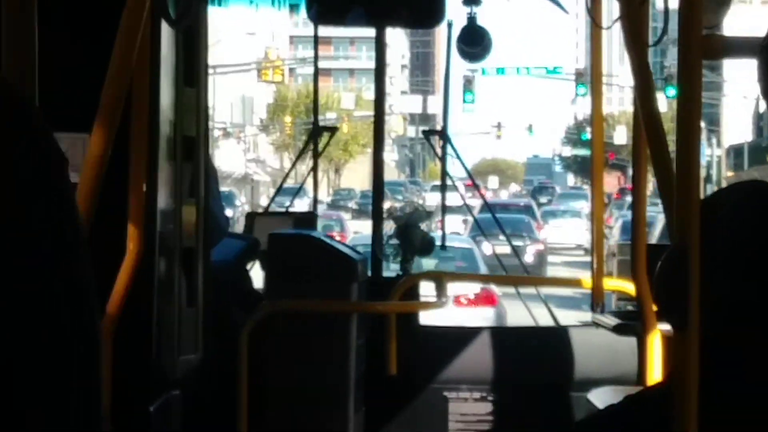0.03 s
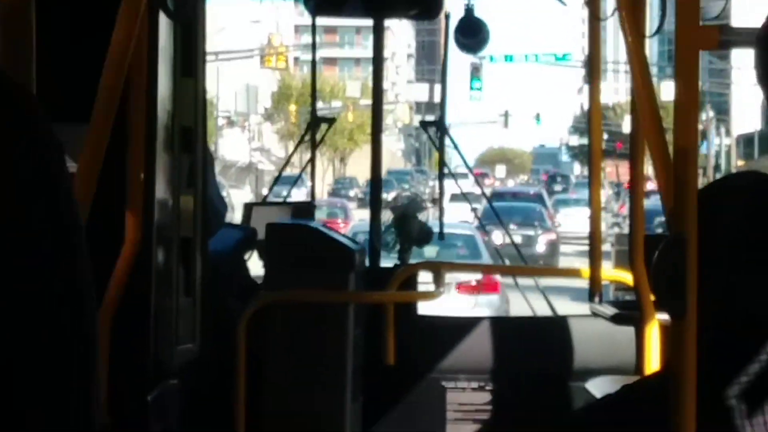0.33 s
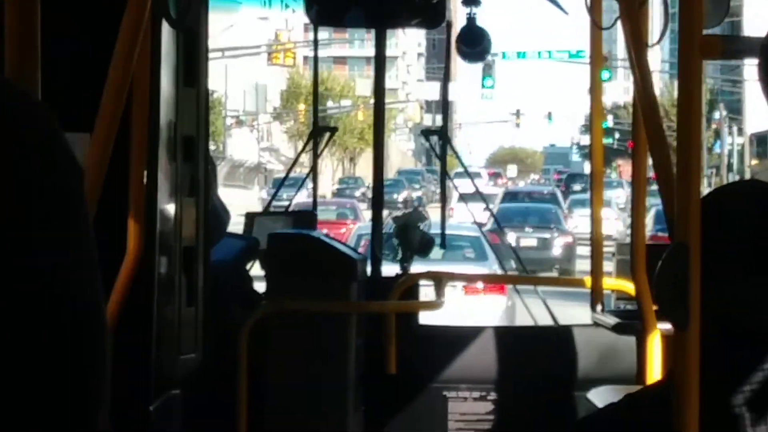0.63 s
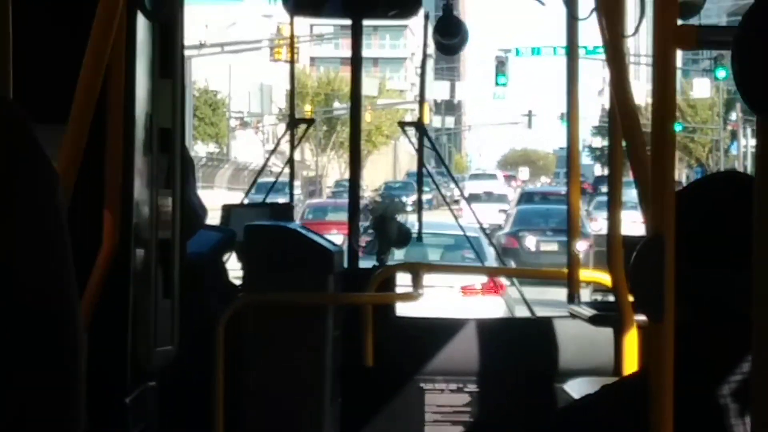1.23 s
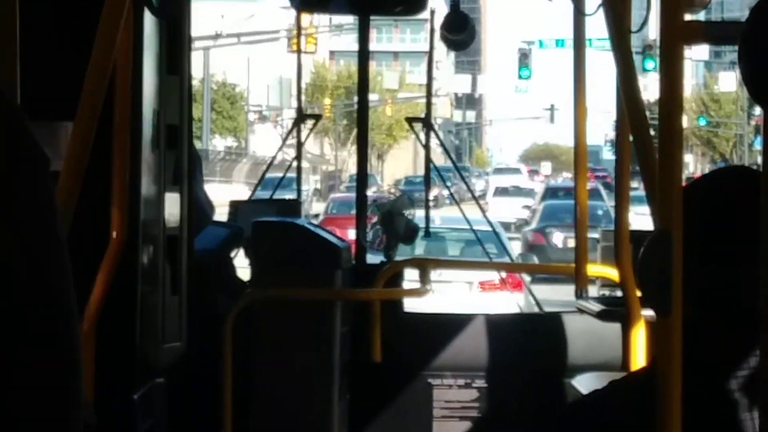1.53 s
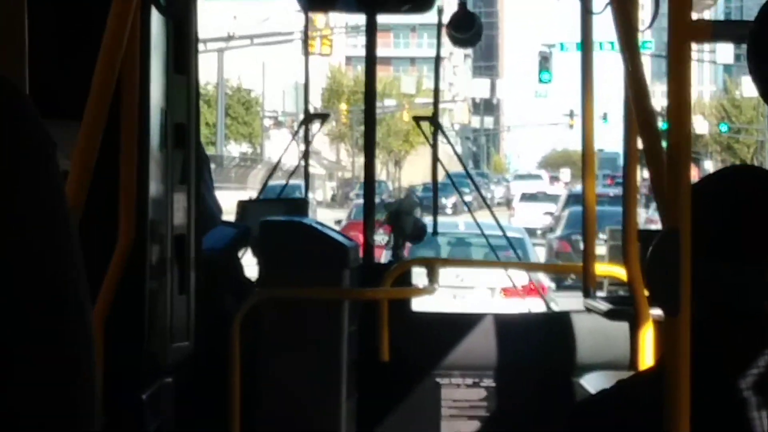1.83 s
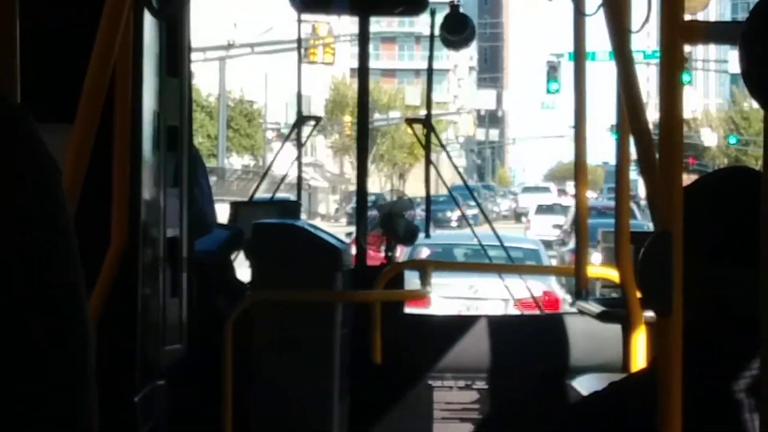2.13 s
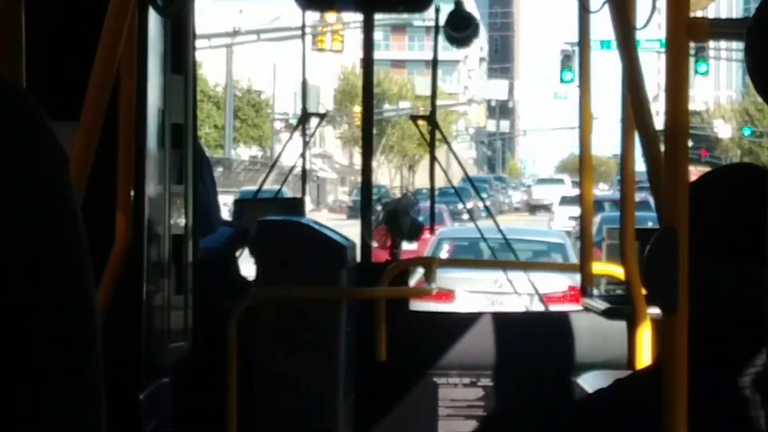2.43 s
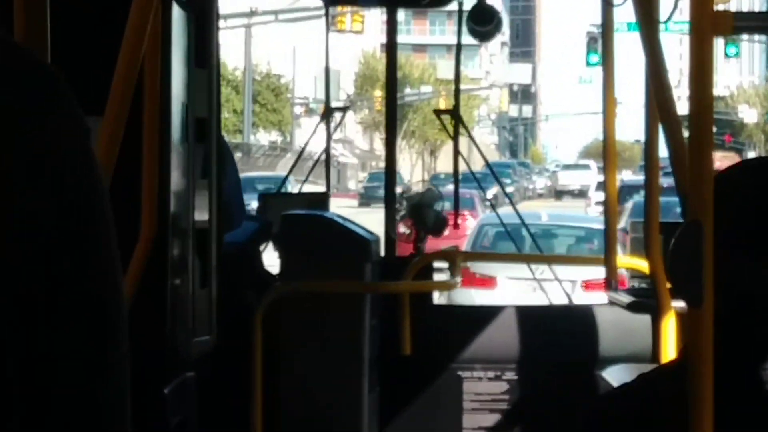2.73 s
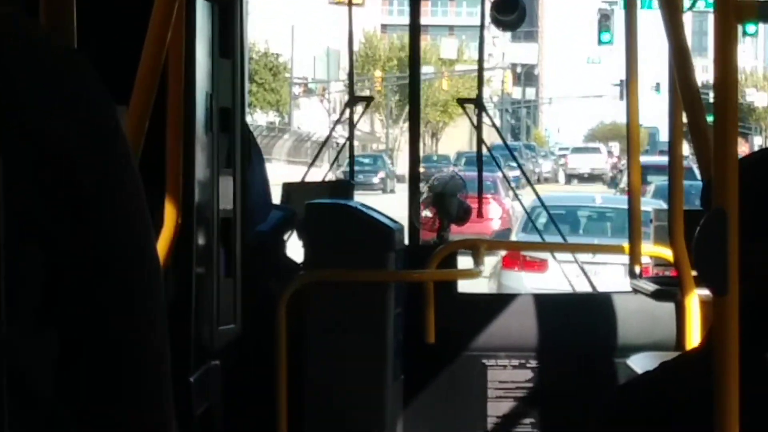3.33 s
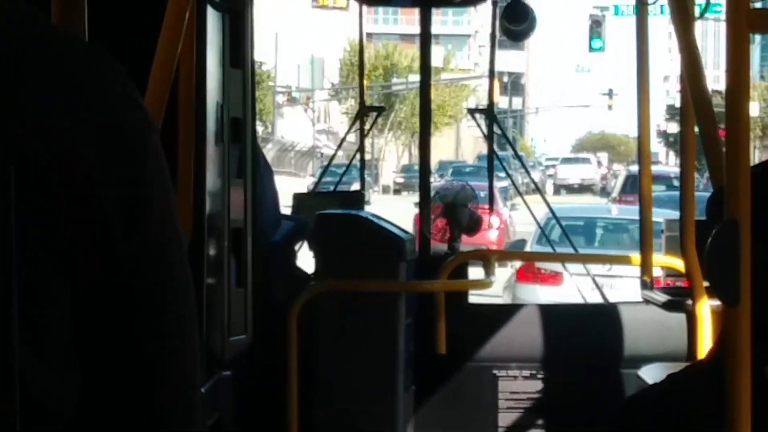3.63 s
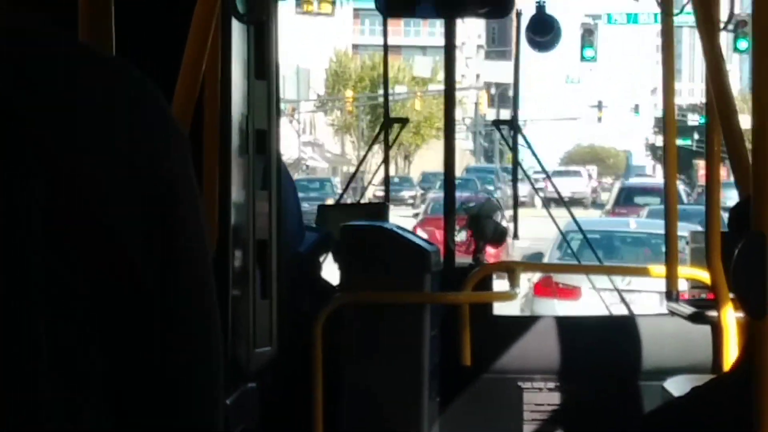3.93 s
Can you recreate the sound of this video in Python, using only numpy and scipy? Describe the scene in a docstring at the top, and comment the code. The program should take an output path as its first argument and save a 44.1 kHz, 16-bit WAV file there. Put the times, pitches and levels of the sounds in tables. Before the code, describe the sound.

A diesel engine drones inside a city bus, its uneven pulse making the panels boom over road rumble, with brief swells near 0.3, 0.5 and 2.9 seconds. A thin high squeal, scattered squeaks and soft blower hiss run throughout. Around 1.3 seconds a faint air puff comes and a belt whine grows. After 3 seconds the drone and rumble ease off, leaving the whine and light trim rubbing.

```python
"""A diesel drone and booming panels over road rumble, inside a city bus in slow traffic.
The six-cylinder engine's uneven firings shake the cabin panels; it eases off after three seconds.
A belt-driven accessory whines on high multiples of its shaft rate, single partials flaring into
squeaks, under a thin high squeal. Behind it, blower air hisses, trim rubs, a valve gives one faint
puff and a fitting ticks."""
import sys
import numpy as np
from scipy import signal
from scipy.fft import rfft, irfft
from scipy.io import wavfile

SR = 44100
rng = np.random.default_rng(int(sys.argv[2]) if len(sys.argv) > 2 else 0)


def wrap_up_sound(samples):
    """Save the sound to the file named by the first command line argument, as 16-bit audio."""
    columns = np.atleast_2d(samples).T
    # keep every value between -1 and 1, then stretch to whole-number steps
    tamed = np.clip(columns, -1, 1)
    steps = np.round(tamed * 32767).astype(np.int16)
    wavfile.write(sys.argv[1], SR, steps)


N = 176400


def undb(db):
    """Decibels to gain."""
    return 10 ** (np.asarray(db) / 20)


def unit(x):
    """Scale to rms 1."""
    return x / np.sqrt(np.mean(np.abs(x) ** 2))


def times():
    """Sample times in seconds."""
    return np.arange(N) / SR


def curve(rows):
    """Join (seconds, value) rows by straight lines."""
    return np.interp(times(), *np.array(rows, float).T)


def swell(middle_s, length_s):
    """Rounded rise and fall, peak 1."""
    return np.exp(-np.abs(2 * (times() - middle_s) / length_s) ** 3 / 2)


def angle(hz):
    """Running phase in radians of a changing rate."""
    return 2 * np.pi * np.cumsum(hz) / SR


def walk(rate_hz):
    """Smooth random drift, rms 1."""
    f = np.fft.rfftfreq(N, 1 / SR)
    return unit(irfft(rfft(rng.standard_normal(N)) / (1 + (f / rate_hz) ** 4), N))


def noise(spectrum):
    """Noise of rms 1 shaped by (Hz, dB) rows, rolled off beyond both ends."""
    hz, db = np.array(spectrum, float).T
    f = np.maximum(np.fft.rfftfreq(N, 1 / SR), 1)
    skirts = np.minimum(f / hz[0], 1) ** 2 * np.minimum(hz[-1] / f, 1) ** 4
    colour = undb(np.interp(np.log(f), np.log(hz), db))
    return unit(irfft(rfft(rng.standard_normal(N)) * skirts * colour, N))


def ring(force, modes):
    """A force through steep resonances (Hz, width in Hz, dB), scaled to rms 1."""
    f = np.maximum(np.fft.rfftfreq(N, 1 / SR), 1)
    power = 0
    for hz, width_hz, db in modes:
        detuning = (f / hz - hz / f) * hz / (2 * width_hz)
        power += undb(db) ** 2 / (1 + detuning ** 2) ** 4
    return unit(irfft(rfft(force) * np.sqrt(power), N))


def tone(phase, rough, rate_hz):
    """Tone of rms 1 that wavers in strength and phase: slow fading plus quick flutter."""
    ratio = np.abs(np.fft.fftfreq(N, 1 / SR)) / rate_hz
    shape = 1 / np.sqrt((1 + ratio ** 2) * (1 + (ratio / 4) ** 4))
    waver = unit(np.fft.ifft(shape * (rng.standard_normal(N) + 1j * rng.standard_normal(N))))
    carrier = np.exp(1j * (phase + rng.uniform(0, 2 * np.pi)))
    return unit(np.real((1 + rough * waver) * carrier))


# Blower air spectrum. Each row: frequency in Hz, relative density in dB.
BLOWER_SPECTRUM = [(1300, -5.5), (1850, -4), (2070, 10), (2270, 0), (2900, -11), (3600, -11.5),
                   (4220, -1.5), (4500, -12.5), (5100, -14), (6000, -41), (8300, -41), (10000, -30.5),
                   (15000, -32)]


def blower():
    """Steady hiss of moving air."""
    return noise(BLOWER_SPECTRUM) * undb(-47)


# Ticks of a fitting. Each row: start in seconds, level in dB, decay in seconds.
FITTING_TICKS = [(3.73, -57, 0.011)]


def fitting():
    """A fitting ticks: a short burst of high noise."""
    t = times()
    envelope = sum(undb(db) * (t >= start_s) * np.exp(-np.abs(t - start_s) / decay_s)
                   for start_s, db, decay_s in FITTING_TICKS)
    return envelope * ring(rng.standard_normal(N), [(12400, 7600, 0)])


# Air puff spectrum. Each row: frequency in Hz, relative density in dB.
VALVE_SPECTRUM = [(3500, -10), (5000, -2.5), (8000, -22), (15000, -24.5)]


def valve(start_s=1.312, attack_s=0.015, decay_s=0.036):
    """A valve lets out one faint puff of air."""
    age_s = np.maximum(times() - start_s, 0)
    rise = np.minimum(age_s / attack_s, 1)
    fall = np.exp(-np.maximum(age_s - attack_s, 0) / decay_s)
    return noise(VALVE_SPECTRUM) * undb(-46) * rise * fall


# Trim resonances. Each row: frequency in Hz, width in Hz, relative level in dB.
TRIM_MODES = [(1589, 62, -3), (1698, 19, 0)]
# Rubbing strength. Each row: time in seconds, level in dB.
RUB_DB = [(0, -61), (.72, -49), (1.15, -54), (1.35, -41.5), (1.95, -48.5), (2.08, -64), (3.1, -44),
          (3.27, -51), (3.37, -37), (3.65, -56.5)]


def trim():
    """Rubbing excites two narrow resonances of the trim."""
    return ring(rng.standard_normal(N), TRIM_MODES) * undb(curve(RUB_DB))


# Road rumble spectrum. Each row: frequency in Hz, relative density in dB.
ROAD_SPECTRUM = [(28, -52.5), (45, -17.5), (66, -13), (82, -7.5), (100, -14.5), (135, -5.5), (175, -5),
                 (225, -6.5), (285, -5.5), (450, -40)]
# Rumble strength. Each row: time in seconds, level in dB.
ROAD_DB = [(0, -32), (3.18, -29.5), (3.4, -42), (3.58, -46.5), (3.7, -38.5), (4, -50.5)]


def road():
    """Low rumble from the road below."""
    return noise(ROAD_SPECTRUM) * undb(curve(ROAD_DB))


# Bus body resonances. Each row: frequency in Hz, width in Hz, relative level in dB.
BODY_MODES = [(461.4, 50, 0), (546, 110, -3), (646, 66, -1), (764, 110, -8), (876, 82, -11),
              (1030.6, 78, -7)]
# Roar strength. Each row: time in seconds, relative level in dB.
BODY_DB = [(0, -28), (.42, -32), (.55, -31), (.8, -34.5), (.97, -27.5), (1.2, -32), (1.5, -28), (2.2, -34),
           (2.85, -27.5), (3.14, -32), (3.33, -47.5), (4, -50.5)]


def body(rattle_db=4.5, gain_db=0.5):
    """Engine and road shake the body into a roar; each resonance rattles up and down on its own."""
    roar = 0
    for hz, width_hz, db in BODY_MODES:
        gain = undb(db + rattle_db * walk(rate_hz=12))
        roar += gain * ring(rng.standard_normal(N), [(hz, width_hz, 0)])
    return unit(roar) * undb(curve(BODY_DB) + gain_db)


# Squeal tones. Each row: frequency in Hz, relative level in dB.
SQUEAL_TONES = [(4205, -3), (4247, 0)]
# Squeal strength. Each row: time in seconds, level in dB.
SQUEAL_DB = [(0, -45.5), (.35, -37), (1.45, -36.5), (1.56, -47.5), (2.1, -42), (2.85, -35.5), (3.1, -41),
             (4, -44)]


def squeal():
    """Two close high tones beat against each other, wobbling and flickering together."""
    wobble_hz = 15 * walk(rate_hz=8.8)
    pair = sum(undb(db) * tone(angle(hz + wobble_hz), rough=0.74, rate_hz=20) for hz, db in SQUEAL_TONES)
    flicker_db = 3 * walk(rate_hz=31)
    return unit(pair * undb(flicker_db)) * undb(curve(SQUEAL_DB))


def partial(shaft, order, rough, rate_hz):
    """Scratchy shaft partial spilling into its two neighbours, each wavering on its own."""
    below, centre, above = (tone((order + step) * shaft, rough, rate_hz) for step in (-1, 0, 1))
    return unit(centre + 0.0045 * order * (below + above))


# Weak accessory partials. Each row: multiple of the shaft rate, level in dB.
CHATTER_ORDERS = [(17, -48.5), (27, -45), (32, -50.5), (36, -62.5), (42, -50.5), (46, -59.5), (51, -57)]


def accessory_chatter(shaft, fade_db=8):
    """Weak shaft partials chatter in and out, partly together."""
    shared_drift = walk(rate_hz=9.8)
    chatter = 0
    for order, db in CHATTER_ORDERS:
        fade = undb(fade_db * np.tanh(shared_drift + walk(rate_hz=6.9)))
        chatter += undb(db) * unit(fade * partial(shaft, order, rough=12.0, rate_hz=13))
    return chatter


# Squeaks, keyed by multiple of the shaft rate. Each row: middle in seconds, length in seconds, peak in dB.
SQUEAKS = {17: [(.9, .062, -38.5), (2.585, 0.4, -39.5), (2.89, 0.21, -34.5), (3.5, 0.13, -41.5)],
           22: [(3.39, .1, -37)], 36: [(.2, 0.59, -50.5), (.24, 0.021, -38.5), (.62, .05, -36.5),
           (.732, 0.054, -37.5), (.96, 0.19, -45), (1.21, 0.044, -36)], 42: [(.68, 0.17, -45),
           (.99, 0.05, -38.5), (1.45, .089, -39), (1.69, 0.073, -39), (1.92, 0.056, -36),
           (2.032, 0.056, -37), (2.5, 0.051, -45), (2.8, 0.2, -42.5), (3.04, 0.14, -40.5),
           (3.289, 0.19, -41), (3.57, 0.094, -36.5)], 46: [(.47, .06, -48), (1.92, 0.26, -47)],
           51: [(.72, 0.054, -47), (1.37, 0.18, -46), (2.93, 0.26, -45.5)], 64: [(2.22, 0.02, -58.5),
           (2.44, 0.164, -53), (3.25, 0.03, -51)]}


def accessory_squeaks(shaft):
    """Single shaft partials flare up; higher ones are rougher and flutter faster."""
    squeaks = 0
    for order, flares in SQUEAKS.items():
        envelope = sum(undb(db) * swell(middle_s, length_s) for middle_s, length_s, db in flares)
        squeaks += envelope * partial(shaft, order, rough=0.016 * order, rate_hz=0.37 * order)
    return squeaks


# Whine strength. Each row: time in seconds, relative level in dB.
WHINE_DB = [(0, -54.5), (1.12, -48), (1.3, -39), (1.4, -30.5), (1.6, -39.5), (1.68, -35.5), (1.85, -39.5),
            (1.93, -37.5), (2.12, -45), (2.3, -43.5), (2.5, -34), (2.72, -40), (2.82, -33), (3.26, -38.5),
            (3.35, -34), (4, -35.5)]


def accessory_whine(shaft, order=27, jitter_rad=0.3, swing_rad=0.28, gain_db=4):
    """The belt-driven accessory's main partial throbs in level and phase once a turn."""
    throb = 1 + 0.74 * np.cos(shaft + jitter_rad * walk(rate_hz=60))
    whine = tone(order * shaft + swing_rad * np.sin(shaft), rough=0.42, rate_hz=9)
    return unit(throb * whine) * undb(curve(WHINE_DB) + gain_db)


# Low engine orders. Each row: multiple of the firing rate, relative level in dB.
ENGINE_ORDERS = [(1, -39.5), (2, -33.5), (2.5, -35.5)]
# Engine load. Each row: time in seconds, gain of the drone in dB.
LOAD_DB = [(0, 4), (1.2, 2.5), (2.1, 2.5), (3.05, 1), (3.25, -7.5), (3.4, -9.5), (3.6, -17.5), (4, -31)]
# Drivetrain tone strength. Each row: time in seconds, relative level in dB.
DRIVETRAIN_DB = [(0, -28.5), (.35, -35), (.46, -20.5), (.88, -40.5), (.98, -21.5), (2.06, -32), (3.2, -25),
                 (3.4, -31), (4, -27.5)]


def engine(firing, pump_hz=157.9):
    """Low firing orders and a pump hum follow the load; the drivetrain tone carries on when it eases."""
    drone = sum(undb(db) * tone(order * firing, rough=0.25 * order, rate_hz=12)
                for order, db in ENGINE_ORDERS)
    pump = undb(-35.5) * tone(2 * np.pi * pump_hz * times(), rough=0.25, rate_hz=2)
    drivetrain = undb(curve(DRIVETRAIN_DB) - 1) * tone(5 * firing, rough=1, rate_hz=9)
    return (drone + pump) * undb(curve(LOAD_DB)) + drivetrain


# Panel surges. Each row: middle in seconds, length in seconds, frequency in Hz, peak in dB.
PANEL_SURGES = [(0.278, 0.15, 381, -15.5), (0.542, 0.012, 345, -10), (0.565, 0.027, 570, -28),
                (2.861, 0.21, 384.1, -19.5)]


def panel_surges():
    """Now and then one panel swells into resonance."""
    return sum(undb(db) * swell(middle_s, length_s) * tone(2 * np.pi * hz * times(), 0.25, rate_hz=20)
               for middle_s, length_s, hz, db in PANEL_SURGES)


# Cabin panel resonances. Each row: frequency in Hz, width in Hz, relative level in dB.
PANEL_MODES = [(287.8, 34, -1.5), (332.2, 14, 0), (368.4, 54, 0), (419.5, 26, -3.5)]
# Gear hum. Each row: multiple of the firing rate, level in dB relative to the ringing panels.
GEAR_ORDERS = [(5.8, -8.5), (6.7, -6.5)]
# Boom strength. Each row: time in seconds, relative level in dB.
BOOM_DB = [(0, -18), (.38, -22.5), (.5, -18), (.88, -22), (1, -21.5), (1.6, -22), (1.95, -19.5),
           (2.08, -34), (2.18, -18), (2.34, -23), (2.39, -18), (2.85, -21.5), (3.15, -21), (3.38, -33),
           (3.49, -25), (3.62, -46), (3.85, -31), (4, -46)]


def panel_boom(firing, cylinders=6, spread_db=6.5, gain_db=2):
    """Uneven firings and road shake make the cabin panels boom, with gear hum mixed in."""
    firing_samples = np.flatnonzero(np.diff(np.floor(firing / (2 * np.pi))))
    cylinder_db = spread_db * rng.standard_normal(cylinders)
    blows = np.zeros(N)
    blows[firing_samples] = undb(np.resize(cylinder_db, len(firing_samples)))
    road_shake = rng.standard_normal(N)
    boom = unit(ring(road_shake, PANEL_MODES) + undb(-3) * ring(blows, PANEL_MODES))
    gears = sum(undb(db) * tone(order * firing, rough=0.36, rate_hz=36) for order, db in GEAR_ORDERS)
    return unit(boom + gears) * undb(curve(BOOM_DB) + gain_db)


# Engine speed. Each row: time in seconds, firings per second.
FIRING_HZ = [(0, 56.6), (2.2, 58), (2.9, 59.2), (3.8, 57.8)]
# Accessory shaft speed. Each row: time in seconds, turns per second.
SHAFT_HZ = [(0, 75.55), (2.55, 76), (3.4, 75.8)]


def scene():
    """All sources from a seat in the cabin, mono."""
    firing = angle(curve(FIRING_HZ))
    shaft = angle(curve(SHAFT_HZ))
    low_end = engine(firing) + panel_boom(firing) + panel_surges() + body() + road()
    accessory = accessory_whine(shaft) + accessory_chatter(shaft) + accessory_squeaks(shaft)
    return (low_end + accessory + squeal() + blower() + trim() + valve() + fitting())[None]


def record(dry):
    """Steep low-pass on the top treble."""
    cutoff_hz = 15700
    return signal.sosfilt(signal.ellip(8, .2, 70, cutoff_hz, fs=SR, output="sos"), dry)


dry = scene()
out = record(dry)
wrap_up_sound(out)
```